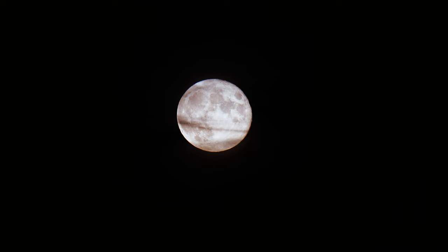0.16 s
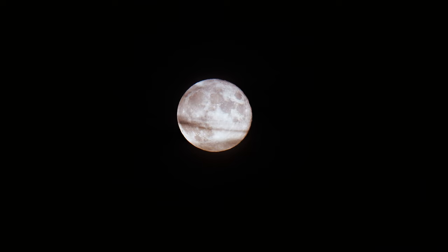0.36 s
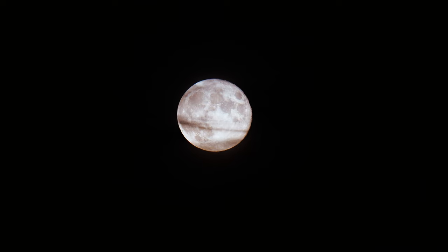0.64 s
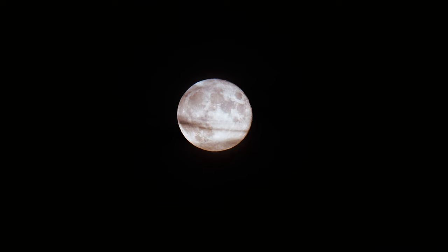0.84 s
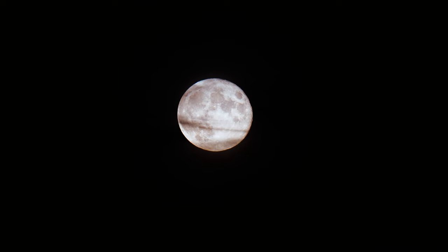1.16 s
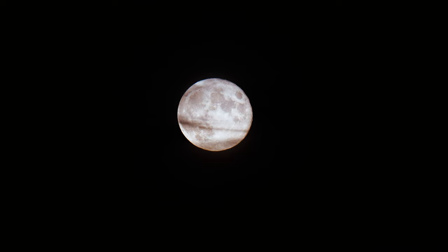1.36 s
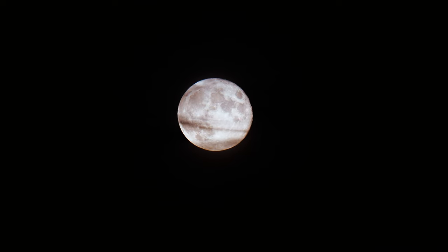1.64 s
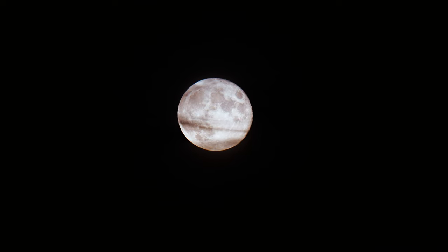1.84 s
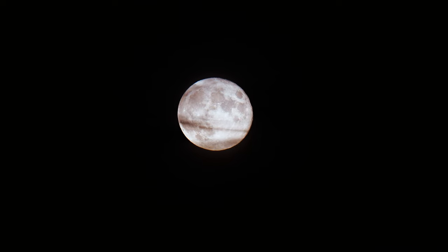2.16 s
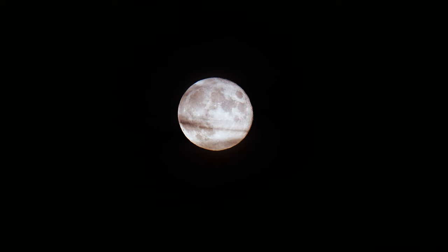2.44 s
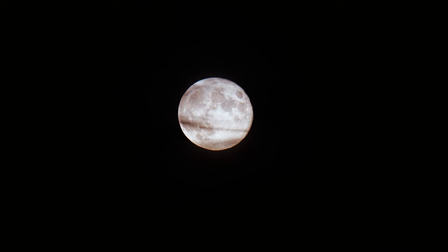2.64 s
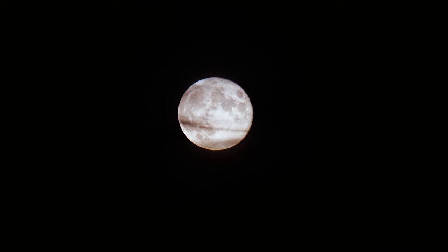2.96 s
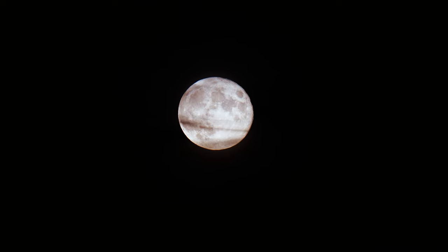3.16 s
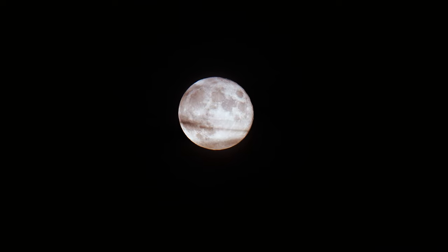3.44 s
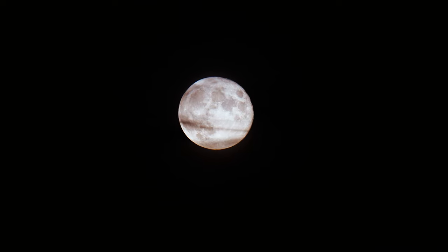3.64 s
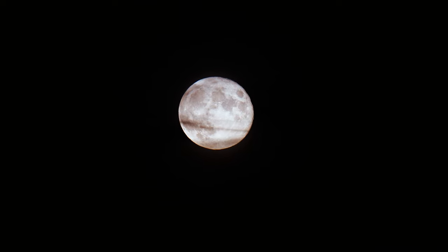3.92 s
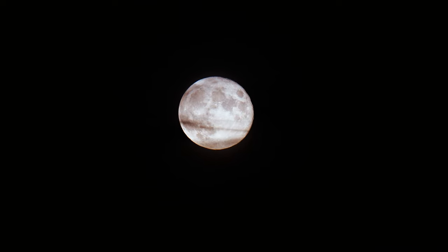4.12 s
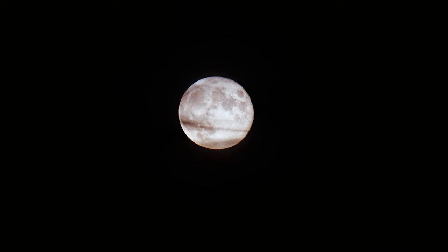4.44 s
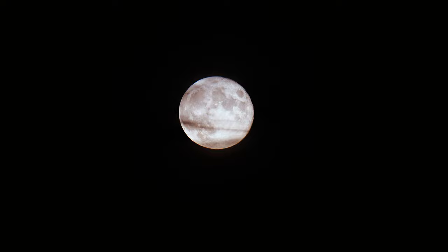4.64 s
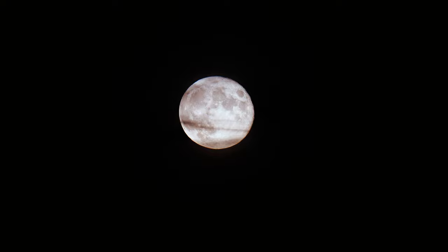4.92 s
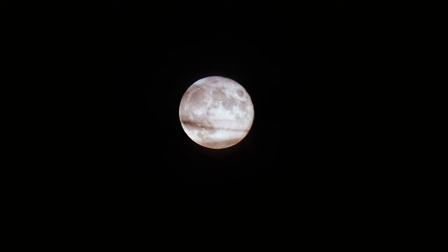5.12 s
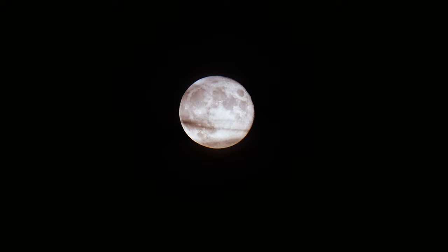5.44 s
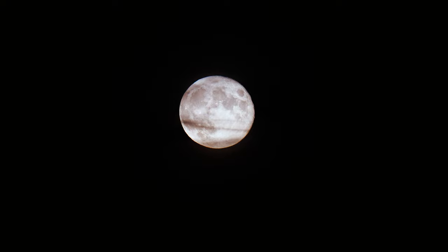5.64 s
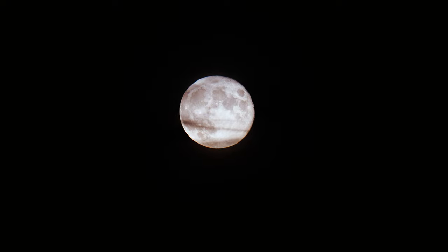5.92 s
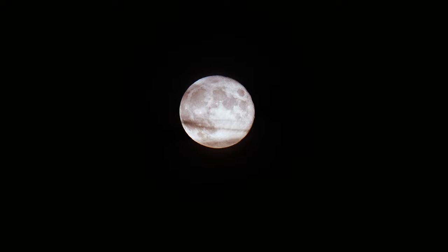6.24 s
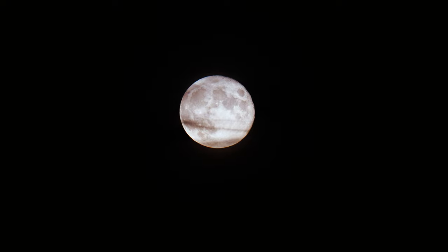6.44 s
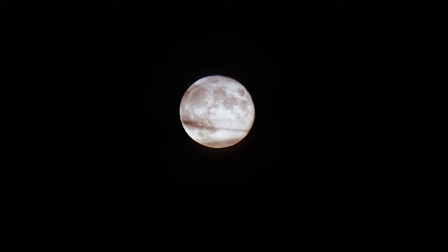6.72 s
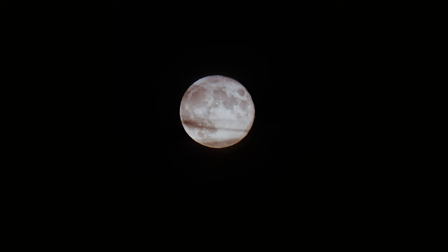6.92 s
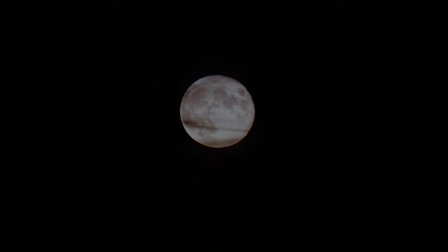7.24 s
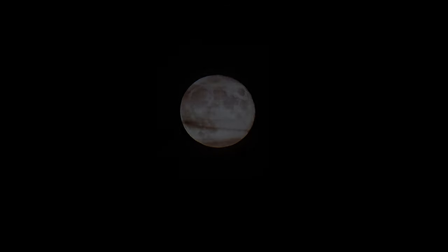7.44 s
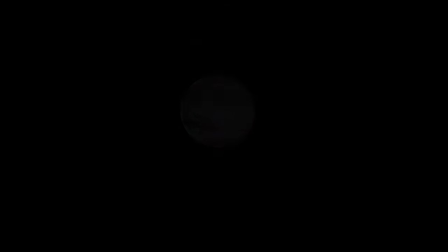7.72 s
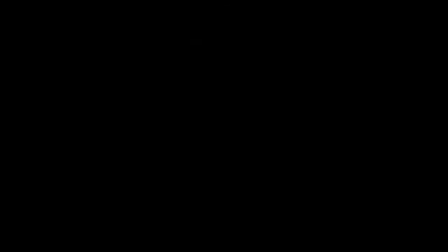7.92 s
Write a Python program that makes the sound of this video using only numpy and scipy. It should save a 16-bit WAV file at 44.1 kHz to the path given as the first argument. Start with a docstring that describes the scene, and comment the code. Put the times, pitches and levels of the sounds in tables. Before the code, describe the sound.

Quiet night at a wood's edge under a moon: a steady, dull low-mid rush of air with soft hiss and barely any hum. At 0 s a near owl is already in a short, smooth, nearly pure hoot around 440 Hz, rising slightly then falling away by 0.3 s. From 0.35 to 2.4 s a farther bird churrs: a screech swelling quickly, throbbing about 55 times a second, growing raspier around 1.6 s. A weaker churr runs from 2.6 to 4.3 s, with the second owl hoot over it at 3.2 to 3.6 s. From 4.5 to 5.8 s a tiny bird whistles very faintly near 4 kHz, first gliding down, then up, then short wavering bits. The strongest churr lasts from 5.35 to 7.3 s, turning harsher after 6.1 s. Faint dull ticks fall at 6.26 and 7.3 s, close by. Only the night air remains, sinking from 7.45 s to the end.

```python
"""Edge of a wood at night: rumble, hiss and mains hum under a near owl's two soft, almost pure hoots.
Further off a night caller, perhaps a second bird, churrs three times: swelling screeches throbbing about
55 times a second, each throb a fast climb in pitch that breaks off in a puff of rasping air.
A small bird whistles faintly as short gliding tones; two dull decaying ticks sound close to the microphone.
Echoes are a ground or bank bounce plus decaying scatter; the level sinks at the end."""
import sys
import numpy as np
from scipy import signal
from scipy.fft import rfft, irfft, next_fast_len
from scipy.io import wavfile
from scipy.ndimage import uniform_filter1d

SR = 44100
rng = np.random.default_rng(int(sys.argv[2]) if len(sys.argv) > 2 else 0)


def digitize_waveform(pressure):
    """Quantize a signal to 16-bit integers and store it at the path in sys.argv[1].

    Rows of a 2-D input are taken as channels; values are limited to [-1, 1].
    """
    field = np.atleast_2d(pressure).T
    bounded = np.clip(field, -1, 1)
    quanta = np.round(bounded * 32767).astype(np.int16)
    wavfile.write(sys.argv[1], SR, quanta)


N = 356151


def undb(db):
    """Decibels to gain."""
    return 10 ** (np.asarray(db) / 20)


def unit(x):
    """Scale to rms 1."""
    return x / np.sqrt(np.mean(x ** 2))


def colour(x, points):
    """Filter by (frequency [Hz], gain [dB]) points, joined on a log frequency axis."""
    point_hz, point_db = np.transpose(points)
    size = next_fast_len(len(x))
    bin_hz = np.maximum(np.arange(size // 2 + 1) * SR / size, 1)
    gain_db = np.interp(np.log(bin_hz), np.log(point_hz), point_db)
    return irfft(rfft(x, size) * undb(gain_db), size)[:len(x)]


def walk(rate_hz, count):
    """Smooth random drift, rate_hz new values a second, spread about 1."""
    hold = max(int(SR / rate_hz), 1)
    held = np.repeat(rng.standard_normal(count // hold + 1), hold)[:count]
    return 1.3 * uniform_filter1d(uniform_filter1d(held, hold), hold)


def span(start_s, end_s, edge_s):
    """A call's first sample, its times and its soft edges."""
    i = int(start_s * SR)
    t = np.arange(i, min(int(end_s * SR), N)) / SR
    return i, t, np.clip(np.minimum(t - start_s, end_s - t) / edge_s, 0, 1)


def curve(t, s, values):
    """Points joined by lines with rounded corners."""
    return uniform_filter1d(np.interp(t, s, values), size=600, mode="nearest")


def turn_on(t, at_s, within_s):
    """A smooth step from 0 to 1."""
    return .5 + .5 * np.tanh((t - at_s) / within_s)


def sine(hz):
    """Sine of varying frequency: phase is the running sum of frequency."""
    return np.sin(2 * np.pi * np.cumsum(hz) / SR)


def wood(x, wet_db, t60_s, rise_s, ground_s, ground_db):
    """Direct sound, one bounce off the ground or a far bank, and trunk scatter that builds up and dies away."""
    t = np.arange(SR) / SR
    envelope = np.exp(-np.log(1000) * t / t60_s) * (1 - np.exp(-t / rise_s))
    scatter = unit(rng.standard_normal(SR) * envelope) / np.sqrt(SR)
    response = undb(wet_db) * scatter
    response[0] += 1
    response[int(ground_s * SR)] += undb(ground_db)
    return signal.fftconvolve(x, response)[:len(x)]


# night air spectrum: (frequency [Hz], relative density [dB])
NIGHT_SPECTRUM = [(60, -36.5), (120, -39), (170, -29), (240, -14.5), (320, -3.5), (420, 0), (520, -1),
                  (790, -7.5), (1300, -15), (2500, -23.5), (4000, -29), (5500, -36), (8000, -43),
                  (15600, -37.5)]
# mains hum: (frequency [Hz], level [dB rms])
HUM = [(50, -72.5)]
AIR_DB_RMS = -43.5


def night():
    """Shaped noise as distant rumble and hiss, the low part swelling a little, plus a mains hum sine."""
    air = unit(colour(rng.standard_normal(N), NIGHT_SPECTRUM)) * undb(AIR_DB_RMS)
    low = colour(air, [(1000, -15.0), (2500, -30.5)])
    swell = undb(0.91 * walk(0.23, N) + 0.52 * walk(6.9, N))
    t = np.arange(N) / SR
    hum = sum(np.sqrt(2) * undb(db) * np.sin(2 * np.pi * hz * t) for hz, db in HUM)
    return air + low * (swell - 1) + hum


# hoots: (start [s], level [dB])
HOOTS = [(-0.123, 0.5), (3.19, 0)]
# course of every hoot: (time after its start [s], pitch [Hz], level re hoot level [dB])
HOOT_COURSE = [(0, 319.5, -49), (0.026, 387.5, -18), (0.052, 427.3, -11), (0.11, 447.3, -8),
               (0.208, 443.2, -10), (0.286, 422.3, -15), (0.336, 387.6, -22), (0.364, 340.8, -29),
               (0.39, 303.9, -50)]
# owl harmonics: (multiple of pitch [1], level before throat and effort [dB]); row 1 is the fundamental
OVERTONES = [(1, 0), (2, -31), (3, -32.5), (4, -38.5), (5, -50), (6, -50), (7, -49), (8, -53.5), (9, -53.5),
             (10, -57), (11, -60.5), (12, -69), (13, -56), (14, -62.5)]
# owl throat resonances and dips: (centre [Hz], half width [Hz], lift [dB])
OWL_THROAT = [(890, 40, -3), (1230, 100, 5), (1780, 100, -3), (2600, 200, -5), (3600, 700, 2),
              (5300, 110, 15), (5800, 500, -16), (6270, 35, 17)]
LEAD_S = 0.2  # already calling when listening begins, so its echo is on the way


def owl():
    """A soft near-sine voice; the faint overtones wander and fade more slowly than the fundamental."""
    lead = int(LEAD_S * SR)
    out = np.zeros(N + lead)
    course_s, course_hz, course_db = np.transpose(HOOT_COURSE)
    for start_s, level_db in np.add(HOOTS, [LEAD_S, 0]):
        i, t, edge = span(start_s, start_s + course_s[-1], edge_s=.004)
        hz = curve(t - start_s, course_s, course_hz)
        db = level_db + curve(t - start_s, course_s, course_db)
        phase = 2 * np.pi * np.cumsum(hz) / SR
        voice = undb(db) * np.sin(phase)
        # pitch still rising: throat not yet open, high overtones dull
        closed_db_per_multiple = np.clip(np.gradient(hz) * SR / 1500, 0, 1)
        effort_db = .3 * (db + 9)
        for k, order_db in OVERTONES[1:]:
            lift_db = sum(d / (1 + ((k * hz - f) / w) ** 2) for f, w, d in OWL_THROAT)
            wander_db = 3 * walk(14, len(t))
            overtone_db = order_db + lift_db - 12 + effort_db - k * closed_db_per_multiple + wander_db
            voice += undb(overtone_db) * np.sin(k * phase)
        out[i:i + len(t)] += np.sqrt(2) * edge * voice
    return wood(out, wet_db=-28.5, t60_s=0.65, rise_s=0.12, ground_s=0.25, ground_db=-34.5)[lead:]


# churrs: (start [s], end [s], nominal full level [dB], swell time constant [s], drift [dB/s],
#  foot of climb at first [Hz], foot in full voice [Hz], mouth opens [s], nominal mouth ring [dB],
#  nominal climb force at first [dB], climb turns forceful [s], rasp peaks [s], nominal peak rasp [dB])
CHURRS = [(0.35, 2.37, -39.5, 0.22, 1, 1738, 1779, 0.85, -15.5, -11, 1.214, 1.6, -13),
          (2.6, 4.3, -45, 0.38, -4, 1840, 1910, 3.5, -13, -3.5, 4.1, 3.7, -27.5),
          (5.35, 7.33, -36, 0.4, -0.2, 1550, 1800, 6.33, -14.5, -4, 6.084, 6.7, -16)]
# leaking air spectrum: (frequency [Hz], relative level [dB])
RASP_SPECTRUM = [(1500, -26.5), (2900, 3), (3400, 6), (3800, -3.5), (4400, 1.5), (5100, -1), (5500, -7.5),
                 (6050, 3.5), (6600, -4), (7250, 2), (7750, 5), (8500, -6.5), (9500, -7.5), (10500, -22.5)]
# churr throat response: (frequency [Hz], gain [dB])
CHURR_THROAT = [(1450, -17.5), (1680, 1.5), (2650, -3.5), (2950, -3.5), (3300, 7.5), (5000, -1.5),
                (5500, -19)]
SWELL_DB = 27.5  # a churr starts this far below full voice
TOP_FIRST_HZ, TOP_FULL_HZ, TOP_SAG_HZ_PER_S = 2278, 2751, 120  # top of the climb; sags after the rasp peak
MOUTH_SHUT_HZ, MOUTH_OPEN_HZ, MOUTH_OPENS_IN_S = 3250, 3885, 0.12
FORCE_FULL_DB, FORCE_COMES_IN_S, FORCE_FALL_DB_PER_S = 4, 0.12, 4
RASP_RISE_DB_PER_S, RASP_FALL_DB_PER_S = 22, 7
OCTAVE_DB = -8.5  # at zero force and evenness


def churr():
    """In each throb the voice rests low, climbs fast and breaks off with a puff of rasping air."""
    out = np.zeros(N)
    for (start_s, end_s, full_db, swell_s, drift_db_per_s, foot_first_hz, foot_full_hz, opens_s, mouth_db,
         weak_db, forces_s, peaks_s, peak_db) in CHURRS:
        i, t, edge = span(start_s, end_s, edge_s=0.026)
        n = len(t)
        # effort grows fast, then levels off; it drives loudness and climb range
        effort = 1 - np.exp(-(t - start_s) / swell_s)
        db = full_db - SWELL_DB * (1 - effort) + drift_db_per_s * (t - start_s)
        late_s = np.maximum(t - peaks_s, 0)
        early_s = np.maximum(peaks_s - t, 0)
        foot_hz = foot_first_hz + (foot_full_hz - foot_first_hz) * effort ** 2
        top_hz = TOP_FIRST_HZ + (TOP_FULL_HZ - TOP_FIRST_HZ) * effort - TOP_SAG_HZ_PER_S * late_s
        mouth_hz = MOUTH_SHUT_HZ + (MOUTH_OPEN_HZ - MOUTH_SHUT_HZ) * turn_on(t, opens_s, MOUTH_OPENS_IN_S)
        force_on = turn_on(t, forces_s, FORCE_COMES_IN_S)
        force_db = weak_db + (FORCE_FULL_DB - weak_db) * force_on - FORCE_FALL_DB_PER_S * late_s
        rasp_db = peak_db - RASP_RISE_DB_PER_S * early_s - RASP_FALL_DB_PER_S * late_s

        # throb slows over the last second of a call
        throb_hz = 55.9 - 4.4 * np.exp((t - t[-1]) / .7)
        turn = np.cumsum(throb_hz * (1 + 0.0091 * walk(40, n))) / SR
        count = turn.astype(int)
        cycle = turn % 1
        # two random draws per throb: climb height, octave strength
        height, strength = rng.standard_normal((count[-1] + 1, 2))[count].T

        ramp = np.clip((cycle - .25) / .42, 0, 1) ** 1.5
        climb = uniform_filter1d(ramp * (cycle < .76), size=60)
        hz = foot_hz + (top_hz - foot_hz) * (1 + 0.059 * height) * climb
        phase = 2 * np.pi * np.cumsum(hz * (1 + .045 * walk(600, n))) / SR
        burst = np.exp(-((cycle - .55) / 0.13) ** 2)
        throb = 0.25 + burst * undb(0.96 * force_db)
        tone = unit(throb * undb(1.1 * walk(400, n)) * np.sin(phase))

        # breath noise rings the mouth resonance, more in each burst
        mouth = undb(mouth_db) * (0.74 + burst) * walk(800, n) * sine(mouth_hz)

        # forceful throbs, often every second one, carry the octave to the top of the climb
        uneven_db = -3.5 * np.abs(strength) + 1.5 * (-1) ** count
        octave_peak = np.exp(-((cycle - .57) / 0.14) ** 2)
        octave_gain = undb(OCTAVE_DB + 1.7 * force_db + uneven_db) * octave_peak
        octave = octave_gain * undb(3.0 * walk(400, n)) * np.sin(2 * phase)

        # air leaks all the time; its treble comes mostly as the puff at the top of the climb
        air = unit(colour(rng.standard_normal(n), RASP_SPECTRUM))
        puff = np.exp(-((cycle - .6) / 0.18) ** 2) * undb(0.28 * uneven_db)
        leak = 1.1 * colour(air, [(6300, -0.5), (7200, -6.5)])
        rasp = leak + 1.95 * puff * colour(air, [(5200, -19.0), (7000, -1)])

        voice = colour(tone + octave + mouth, CHURR_THROAT)
        out[i:i + n] += (voice + undb(rasp_db + 4.5) * rasp) * undb(db - 4.5) * edge
    far = wood(out, wet_db=4.0, t60_s=0.21, rise_s=0.0019, ground_s=0.0059, ground_db=-4.0)
    # leaves swallow the scattered treble, so the puffs arrive sharper than the tone
    scattered = colour(far, [(2800, 1), (4200, -6.5), (7000, -10.5)])
    direct = colour(out, [(2800, -15), (4200, 4), (7000, -3.5)])
    return scattered + direct


# whistles: (start [s], length [s], first pitch [Hz], last pitch [Hz], held before glide [s],
#  level at start [dB], warble spread [Hz])
WHISTLES = [(4.498, 0.13, 3960, 3660, 0.029, -65, 5), (4.67, 0.13, 3860, 4600, 0.0057, -66, 5),
            (4.87, 0.18, 4000, 4050, 0.01, -70, 88), (5.1, 0.09, 3940, 4050, 0.005, -68, 40),
            (5.31, 0.052, 4020, 4040, 0.01, -66, 90), (5.38, 0.035, 4050, 4000, 0.005, -68, 30),
            (5.524, 0.055, 3970, 4100, 0.005, -74, 70), (5.593, 0.035, 4060, 4060, 0.005, -70, 30),
            (5.71, 0.055, 4030, 4000, 0.005, -73.5, 28), (5.785, 0.03, 3960, 3930, 0.005, -63, 90)]
GLIDE_ENDS, WHISTLE_RISE_DB = 0.74, 1  # share of the note; gain over a note


def small_bird():
    """Thin wavering whistles from far off: gliding sines with random warble in pitch and level."""
    out = np.zeros(N)
    for start_s, length_s, first_hz, last_hz, held_s, level_db, warble_hz in WHISTLES:
        i, t, edge = span(start_s, start_s + length_s, edge_s=.01)
        glide_hz = curve(t - start_s, [held_s, GLIDE_ENDS * length_s], [first_hz, last_hz])
        hz = glide_hz + warble_hz * walk(139, len(t))
        db = level_db + WHISTLE_RISE_DB * (t - start_s) / length_s + 1.5 * walk(50, len(t))
        out[i:i + len(t)] += np.sqrt(2) * edge * undb(db) * sine(hz)
    return wood(out, wet_db=-20, t60_s=0.33, rise_s=.01, ground_s=0.0042, ground_db=-5)


# ticks: (time [s], peak level [dB])
TICKS = [(6.257, -47), (7.301, -47)]


def ticks():
    """Two faint dull ticks close to the microphone: one-sided pulses decaying exponentially."""
    out, t = np.zeros(N), np.arange(400) / SR
    for start_s, peak_db in TICKS:
        i = int(start_s * SR)
        out[i:i + len(t)] += undb(peak_db) * np.exp(-t / 0.0008)
    return out


def scene():
    """All voices over the night air."""
    return (night() + owl() + churr() + small_bird() + ticks())[None]


FADE_FROM_S, FADE_DB, TOP_HZ = 7.45, -7.5, 15720


def record(dry):
    """Level faded down at the end, top cut by a steep elliptic low-pass."""
    gone = np.clip((np.arange(N) / SR - FADE_FROM_S) / (N / SR - FADE_FROM_S), 0, 1)
    faded = dry * undb(FADE_DB * gone ** 1.6)
    low_pass = signal.ellip(10, .2, 70, TOP_HZ, fs=SR, output="sos")
    return signal.sosfilt(low_pass, faded)


dry = scene()
out = record(dry)
digitize_waveform(out)
```